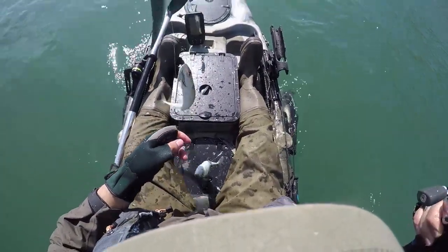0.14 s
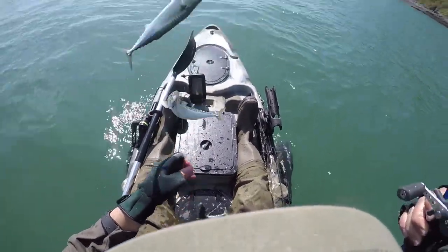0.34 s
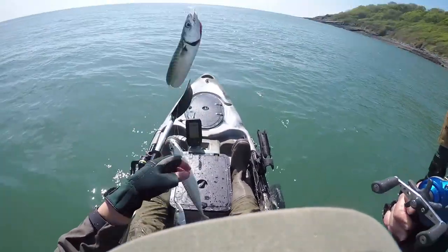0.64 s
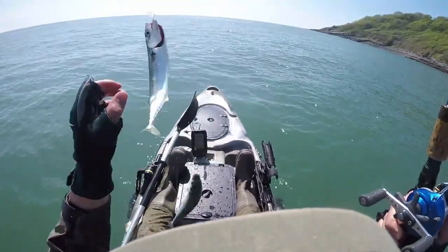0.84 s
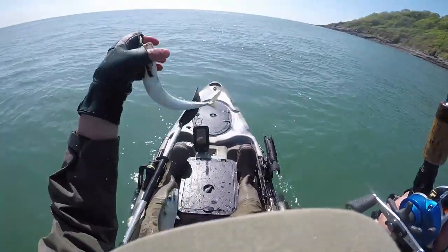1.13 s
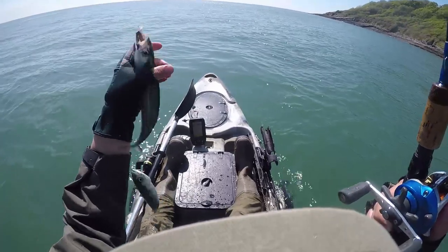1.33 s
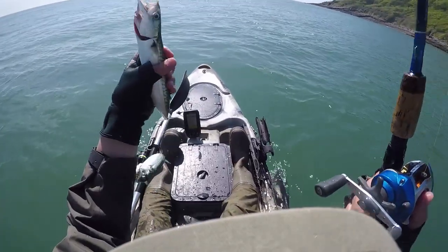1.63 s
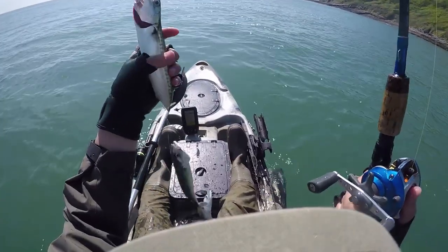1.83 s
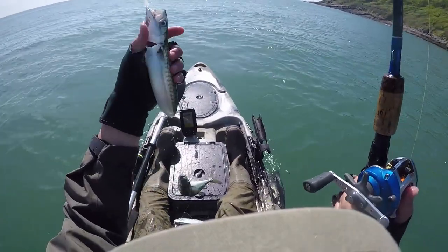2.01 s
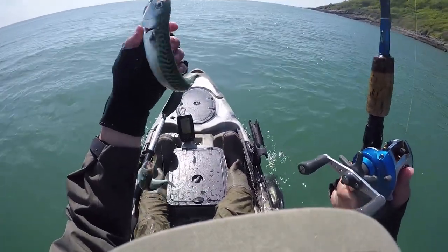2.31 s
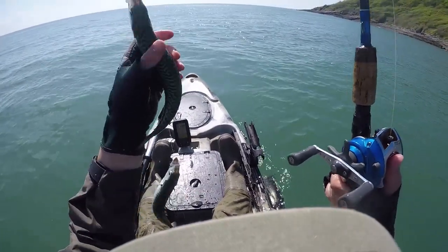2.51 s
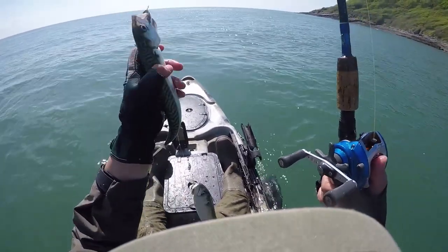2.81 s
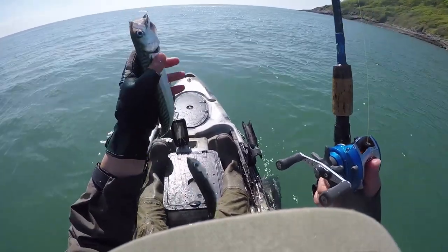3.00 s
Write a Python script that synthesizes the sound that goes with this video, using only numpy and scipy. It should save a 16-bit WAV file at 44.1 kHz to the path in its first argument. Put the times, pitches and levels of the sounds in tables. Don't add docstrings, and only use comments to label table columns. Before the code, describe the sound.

Frantic fish tails drum on a small boat's hollow plastic deck over lapping water and wind

```python
import sys
import numpy as np
from scipy import signal
from scipy.fft import rfft, irfft
from scipy.io import wavfile
from scipy.ndimage import uniform_filter1d

SR = 44100
rng = np.random.default_rng(int(sys.argv[2]) if len(sys.argv) > 2 else 0)


def voltage_ratio(decibels):
    exponent = np.asarray(decibels, float) / 20
    return 10 ** exponent


def bounce(signal):
    frames = np.transpose(np.atleast_2d(signal))
    limited = np.clip(frames, -1, 1)
    pcm = np.round(limited * 32767).astype(np.int16)
    wavfile.write(sys.argv[1], SR, pcm)


N = 138915


def curve(table, col=1):
    hz = np.arange(N // 2 + 1) * SR / N + 1e-3
    points = np.array(table)
    return np.interp(np.log(hz), np.log(points[:, 0]), points[:, col])


def unit(x):
    return x / np.sqrt(np.mean(x ** 2))


def walk(rate):
    hold = int(SR / rate)
    steps = np.repeat(rng.standard_normal(N // hold + 1), hold)
    return 1.3 * uniform_filter1d(uniform_filter1d(steps, hold), hold)[:N]


def restless(colour, flicker_db, rate, octaves=15):
    spectrum = rfft(rng.standard_normal(N)) * voltage_ratio(curve(colour))
    octave = np.log2(np.arange(N // 2 + 1) * SR / N + 1e-3)
    out = np.zeros(N)
    for centre in range(4, octaves):
        share = np.clip(1 - abs(octave - centre), 0, 1)
        out += irfft(spectrum * share, N) * voltage_ratio(flicker_db * walk(rate))
    return unit(out)


def add(out, at_s, sound):
    i = max(int(at_s * SR), 0)
    out[..., i:i + sound.shape[-1]] += sound[..., :out.shape[-1] - i]


def blow(modes, contact_ms, peak_db, swell_ms, choke_ms):
    t = np.arange(SR // 5) / SR
    ms = t * 1000
    hz, gain, t60_s = (v[:, None] for v in modes)
    decay = np.exp(-np.log(1000) * t / t60_s)
    ring = np.real(gain * np.exp(2j * np.pi * hz * t) * decay).sum(axis=0)
    push_ms = ms[:SR // 20]
    push = push_ms * np.exp(-push_ms / max(contact_ms, .01))
    sound = -signal.fftconvolve(ring, push)[:len(ms)]
    sound *= (1 - np.exp(-ms / swell_ms)) * np.exp(-(ms / choke_ms) ** 3)
    return sound * voltage_ratio(peak_db) / abs(sound).max()


def tail_beats(hits, modes, late_s, swell_ms, choke_ms, scatter):
    out = np.zeros(N)
    hz, db, t60_s = np.array(modes).T
    crest_s, spread_s = 0.003, .00018
    for at_s, peak_db, contact_ms in hits:
        detune, level, lag = scatter * rng.standard_normal((3, len(hz)))
        phase = np.exp(-2j * np.pi * hz * (crest_s + spread_s * abs(lag)))
        gain = -voltage_ratio(db + 2 * level) * phase
        spot = (hz * (1 + 0.036 * detune), gain, t60_s)
        add(out, at_s + late_s, blow(spot, contact_ms, peak_db, swell_ms, choke_ms))
    return out


# start_s [s], peak_db [dB], contact_ms [ms]
PANEL_HITS = [(0.004, -17.5, 0.38), (0.091, -9.5, 0.96), (0.161, -23, 0.29), (0.235, -8, 2),
              (0.314, -2, 0.87), (0.343, -14, 0.44), (0.401, -11.5, 0.24), (0.497, -10.5, 0.17),
              (0.554, -17, 0.39), (0.599, -12, 0.13), (0.626, -9.5, 0.14), (0.663, -9, 0.32),
              (0.694, -4.5, 0.071), (0.721, -9.5, 0.11), (0.782, -16.5, 1.1), (0.821, -11.5, 0.34),
              (0.876, -14.5, 1.4), (0.93, -10.5, 0.075), (1.007, -7.5, 0.22), (1.139, -19, 0.6),
              (1.224, -16.5, 0.57), (1.257, -12, 0.46), (1.301, -9, 0.54), (1.3965, -4, 0.28)]
# pitch_hz [Hz], level_db [dB], t60_s [s]
PANEL_MODES = [(104, -18, 0.096), (173.7, -3.5, 0.073), (237, -7, 0.069), (275, -6, 0.088),
               (307, -1, 0.098), (384, 2, 0.067), (500, 1.5, 0.04), (690.5, -6.5, 0.06),
               (1003, -13.5, 0.056), (1316, -12, 0.022), (1610, -20, 0.035)]


def panel_knocks():
    return tail_beats(PANEL_HITS, PANEL_MODES, late_s=0.00083, swell_ms=5.1, choke_ms=30.5, scatter=1)


# start_s [s], peak_db [dB], contact_ms [ms]
HATCH_HITS = [(1.584, -9, 0.11), (1.647, -16.5, 0.29), (1.682, -3, 0.32), (1.766, -8, 1.76),
              (1.845, -6.5, 0.56), (1.875, -17, 0.32), (1.935, -16.5, 2.4), (2.027, -9.5, 0.86),
              (2.066, -26, 0.3), (2.124, -3.5, 0.77), (2.213, -1.5, 0.2), (2.377, -3.5, 0.33),
              (2.468, -2.5, 0.61), (2.5585, -2, 0.34), (2.582, -21, 0.3), (2.65, -6, 0.42),
              (2.738, -4.5, 0.66), (2.8277, -4, 0.69), (2.919, -4.5, 0.47), (3.001, -3.5, 1.3),
              (3.039, -14.5, 0.59)]
# pitch_hz [Hz], level_db [dB], t60_s [s]
HATCH_MODES = [(104, -10, 0.055), (171, -5, 0.13), (241.3, 0, 0.065), (263.4, -4.5, 0.081),
               (309.6, 0, 0.11), (399, -2.5, 0.042), (510, 1, 0.04), (626, -1, 0.054), (844, -4, 0.04),
               (1030, -1, 0.05), (1380, -26, 0.035)]


def hatch_knocks():
    return tail_beats(HATCH_HITS, HATCH_MODES, late_s=0, swell_ms=5, choke_ms=27, scatter=0.5)


# [dB,
# dull part re peak]
WET_SLAPS = [(0.0044, -20.5, -5), (0.0303, -32.5, -7), (0.0804, -16, -4), (0.1612, -26, 4.5),
             (0.2404, -28, -2), (0.3107, -35.5, 8), (0.4, -23, 5), (0.4488, -34, -3), (0.4936, -26, 8),
             (0.5815, -28.5, 5.5), (0.599, -22.5, 12), (0.6163, -26, 11.5), (0.6243, -38.5, 28),
             (0.6612, -18.5, -4), (0.687, -27.5, 14.5), (0.7506, -22.5, -5), (0.7812, -28.5, 4),
             (0.828, -41, 25.5), (0.9292, -27.5, 13), (1.006, -20, 2), (1.0947, -28, 5), (1.112, -27, 1),
             (1.2125, -28.5, 5), (1.2281, -30.5, 5.5), (1.3293, -11, -10),
             (1.3954, -24, 3), (1.5857, -24, 4), (1.6102, -29.5, 8.5), (1.6607, -34, 10),
               (1.6804, -31.5, 11), (1.7718, -38.5, 13), (1.847, -24.5, 7), (1.8753, -36.5, 20),
               (1.9705, -31, 15), (2.004, -38, 6), (2.0298, -29.5, 6), (2.0621, -29, 8),
               (2.1243, -20.5, -4), (2.2118, -29.5, 13), (2.2921, -32.5, 9.5), (2.376, -23.5, 7.5),
               (2.4676, -26.5, 8), (2.5571, -20.5, 1.5), (2.581, -37, 17), (2.649, -30, 6),
               (2.721, -33, -12), (2.738, -18.5, -1.5), (2.8294, -24, 0.5), (2.8597, -36.5, 14.5),
               (2.919, -20, 2), (2.951, -42, 12), (3.0016, -18, 2), (3.038, -23.5, 7)]
# pitch_hz [Hz], level_db [dB]
WET_COLOUR = [(2000, -11), (3600, 7.5), (5000, 3.5), (7500, 12), (10000, 5), (12500, -8.5), (14300, -7),
              (15300, -51)]


def slaps():
    out = np.zeros((2, N))
    ms = np.arange(4096) / SR * 1000
    hz = np.arange(2049) * SR / 4096 + 1
    colour_hz, colour_db = np.array(WET_COLOUR).T
    bright = voltage_ratio(np.interp(np.log(hz), np.log(colour_hz), colour_db, left=-60))
    dull_hz, dull_width_hz = 1070, 1900
    dull = 1 / (1 + ((hz - dull_hz) / dull_width_hz * 2) ** 2) ** 2
    rise_ms, length_ms, tail_ms, tail_db = 3.67, 6.9, 21, -22.5
    body = np.exp(-(ms / length_ms) ** 2) + voltage_ratio(tail_db) * np.exp(-ms / tail_ms)
    shape = (1 - np.exp(-ms / rise_ms)) * body
    crackle_db, patchy_db = 3.5, 4
    for at_s, peak_db, dull_db in WET_SLAPS:
        grains = np.repeat(rng.standard_normal(128), 32)
        crackle = voltage_ratio(crackle_db * uniform_filter1d(grains, 16))
        tilt = np.interp(np.log2(hz), np.arange(5, 15, .4), rng.standard_normal(25))
        noise = rfft(rng.standard_normal((2, 4096))) * voltage_ratio(patchy_db * tilt)
        skin = unit(irfft(noise * bright)) * unit(crackle)
        flesh = voltage_ratio(dull_db) * unit(irfft(noise * dull))
        add(out, at_s, voltage_ratio(peak_db - 9.5) * shape * (skin + flesh))
    return out


# start_s [s], peak_db [dB]
BODY_BLOWS = [(0.516, -14.5), (0.593, -20.5), (0.688, -12), (0.78, -13.5), (0.864, -15), (0.963, -15.5),
              (1.12, -16.5), (1.309, -11.5), (1.511, -16.5), (1.612, -15), (1.839, -28), (1.923, -28),
              (2.323, -26)]


def booms():
    out = np.zeros(N)
    for at_s, peak_db in BODY_BLOWS:
        pair_hz = 72 * np.array([1, 1.5]) * (1 + 0.144 * rng.standard_normal(2))
        air = (pair_hz, np.array([1, .4]), np.full(2, .16))
        add(out, at_s, blow(air, contact_ms=2.5, peak_db=peak_db, swell_ms=8.1, choke_ms=44))
    return out


# middle_s [s], length_s [s, half-width of the swell], level_db [dB]
DRAGS = [(0.138, 0.047, -30), (0.265, 0.048, -39), (0.322, 0.033, -26.5), (0.425, 0.032, -27.5),
         (0.628, 0.03, -28.5), (0.67, 0.0099, -29), (0.708, 0.026, -25.5), (0.77, 0.079, -23),
         (0.857, 0.028, -33.5), (0.999, 0.029, -28), (1.015, 0.019, -28.5), (1.258, 0.04, -29),
         (1.313, 0.025, -28), (1.405, 0.07, -34), (2.353, 0.091, -35), (2.856, 0.03, -31.5)]


def scuffs():
    t = np.arange(N) / SR
    pushes_per_s, spread_db = 350, 8
    pushes = (rng.uniform(size=N) < pushes_per_s / SR) * rng.standard_normal(N)
    pushes *= voltage_ratio(spread_db * rng.standard_normal(N))
    hz, db, t60_s = np.array(PANEL_MODES).T
    ring = blow((hz, voltage_ratio(db), t60_s), contact_ms=0.2, peak_db=0, swell_ms=5.1, choke_ms=9.6)
    drag = np.zeros(N)
    for at_s, length_s, level_db in DRAGS:
        drag += voltage_ratio(level_db) * np.exp(-((t - at_s) / length_s) ** 2)
    return drag * unit(signal.fftconvolve(pushes, ring)[:N])


# start_s [s], peak_db [dB], pitch_hz [Hz]
FLICKED_DROPS = [(0.4493, -34, 3840), (1.056, -39, 2980), (1.1415, -34.5, 3400), (1.513, -31, 7500),
                 (1.6117, -31, 3390), (1.6477, -33.5, 3420), (1.662, -41, 2820), (1.804, -39, 3830),
                 (1.985, -38, 2970), (2.007, -34, 3320), (2.019, -38, 4210), (2.0647, -34, 3270),
                 (2.141, -42, 3550), (2.2447, -40, 3800), (2.2816, -44, 3280), (2.2927, -47, 2920),
                 (2.581, -32, 3570), (2.7144, -37.5, 3640), (2.7236, -28, 6700), (2.773, -39, 4030),
                 (2.8609, -31, 3530), (2.9512, -28, 3430)]


def ticks():
    out = np.zeros(N)
    for at_s, peak_db, pitch_hz in FLICKED_DROPS:
        hz = pitch_hz * (1 + 0.072 * rng.standard_normal(3))
        modes = (hz, np.ones(3), np.full(3, 0.02))
        add(out, at_s, blow(modes, contact_ms=0.025, peak_db=peak_db - 8, swell_ms=0.79, choke_ms=2.6))
    return out


# start_s [s], pitch_hz [Hz], peak_db [dB], t60_s [s]
PLINKS = [
    (.6, 1700, -20, 0.013),
    (.603, 2030, -28, .03),
    (0.607, 3010, -35, 0.015),
    (.628, 2120, -31, .03),
    (0.644, 1870, -31, .03),
    (.624, 1760, -20.5, 0.032),
    (.829, 1840, -32.5, 0.036),
    (1.784, 2020, -25.5, 0.011),
]


def plinks():
    out = np.zeros(N)
    for at_s, pitch_hz, peak_db, t60_s in PLINKS:
        mode = (np.array([pitch_hz]), np.ones(1), np.array([t60_s]))
        add(out, at_s, blow(mode, contact_ms=0.045, peak_db=peak_db, swell_ms=0.052, choke_ms=3.4))
    return out


# pitch_hz [Hz], level_db [dB]
LAPPING = [(150, 1), (300, 6), (770, -4), (1600, -14.5), (2900, -28.5), (10500, -33),
           (12300, -42), (13800, -56), (15000, -90)]


def water():
    count = int(110 * N / SR)
    when_s = rng.uniform(size=count) * N / SR
    size = np.minimum(rng.exponential(size=count), 2)
    fade = np.exp(-np.arange(600) / SR / .004)
    patter = np.zeros(N)
    for at_s, s in zip(when_s, size):
        add(patter, at_s, voltage_ratio(-60 + 4 * s) * fade)
    versions = []
    for _ in range(2):
        lapping = voltage_ratio(-36) * restless(LAPPING, 2.3, 21.96)
        droplets = patter * restless(WET_COLOUR, 8.7, 41.2)
        versions.append(lapping + droplets)
    return np.array(versions)


# [dB, left minus right]
GUSTS = [
    (0.0, -21, -9),
    (0.8, -21, -9),
    (1.7, -18.5, 1.5),
    (2.1, -20.5, 1),
    (2.28, -19, -3),
    (2.451, -21.5, -1),
    (3.15, -25, -10),
]
# pitch_hz [Hz], level_db [dB]
WIND_COLOUR = [(12, -8), (22, -1.5), (70, 5.5), (150, -5), (290, -12.5), (500, -20.5),
               (2000, -110)]
# pitch_hz [Hz], level_db [dB]
LEFT_WHISTLE = [(60, 1), (150, 7.5), (400, -7.5)]


def wind():
    at_s, level_db, pan_db = np.array(GUSTS).T
    t = np.arange(N) / SR
    gust = voltage_ratio(np.interp(t, at_s, level_db))
    pan = voltage_ratio(np.interp(t, at_s, pan_db / 2))
    shared, left, right = (restless(WIND_COLOUR, 4.5, 9.2, octaves=12) for _ in range(3))
    left = irfft(rfft(left) * voltage_ratio(curve(LEFT_WHISTLE)), N)
    alike = 0.24
    ports = np.sqrt(alike) * shared + np.sqrt(1 - alike) * np.array([left, right])
    return gust * np.array([pan, 1 / pan]) * ports


# pitch_hz [Hz], level_db [dB], ahead_rad [radians], likeness [0-1]
LEFT_PORT = [(130, 0, 0, .9), (300, -11, 0, .95), (520, -13, 1.7, .8), (900, -1, 2.1, .9),
             (1800, 0, 2.0, .9), (2200, 8, 2.1, .8), (2500, 1, 0, .6), (4300, 0, 0, .9),
             (7300, -7, 1.8, .3), (11000, 2, .6, .4)]


def scene():
    deck = rfft(panel_knocks() + hatch_knocks() + booms() + scuffs() + ticks() + plinks())
    same, other = rfft(slaps() + water())
    alike = np.clip(curve(LEFT_PORT, col=3), 0, 1)
    housing = voltage_ratio(curve(LEFT_PORT)) * np.exp(1j * curve(LEFT_PORT, col=2))
    left = housing * (deck + alike * same + np.sqrt(1 - alike ** 2) * other)
    right = deck + same
    return voltage_ratio(3.5) * irfft(np.array([left, right]), N) + wind()


def roll_off(x):
    return signal.sosfilt(signal.butter(12, 15630, fs=SR, output="sos"), x)


def record(dry):
    ceiling, top_hz = 1.25, 15500
    rounded = ceiling * np.tanh(dry / ceiling)
    low_pass = signal.ellip(8, .2, 70, top_hz, fs=SR, output="sos")
    mix = signal.sosfilt(low_pass, rounded)
    return roll_off(mix)


dry = scene()
out = record(dry)
bounce(out)
```